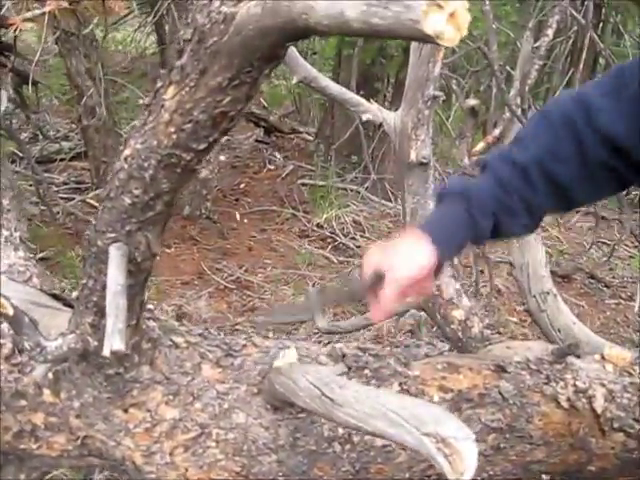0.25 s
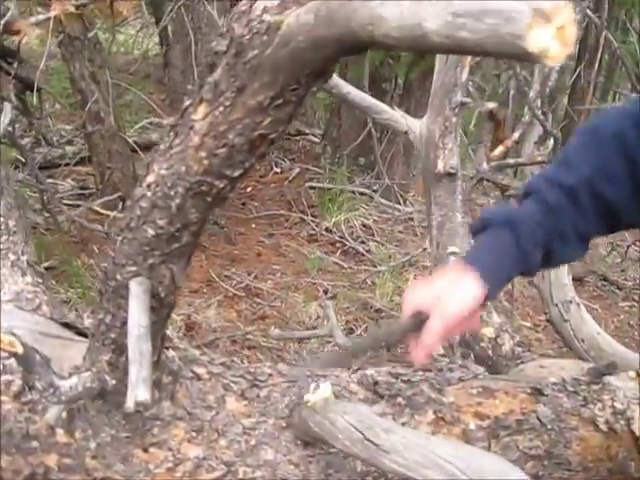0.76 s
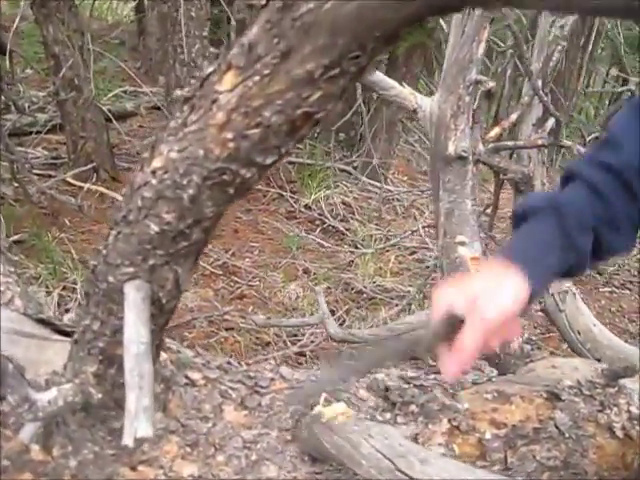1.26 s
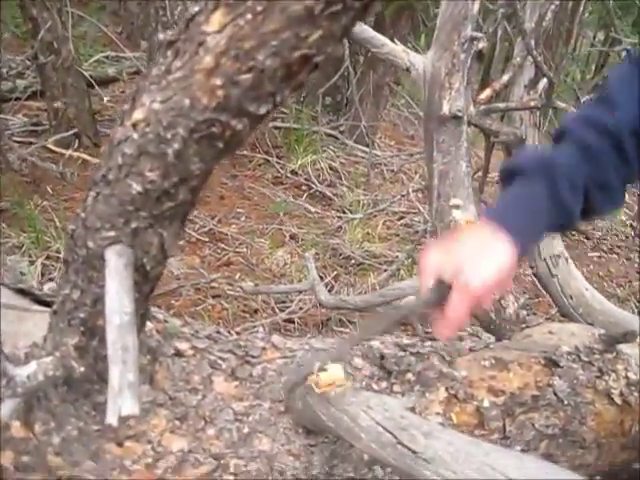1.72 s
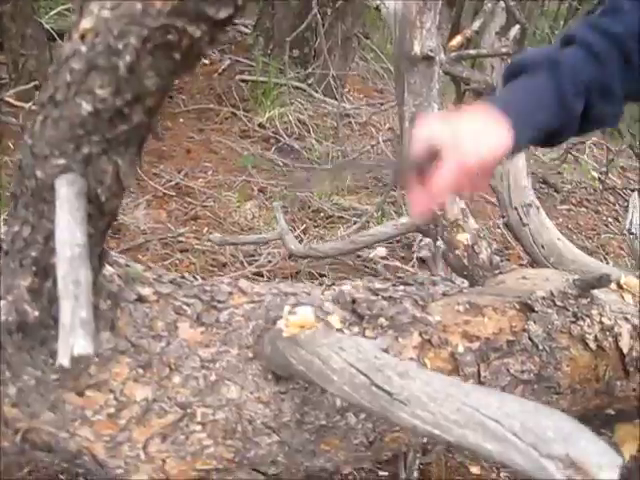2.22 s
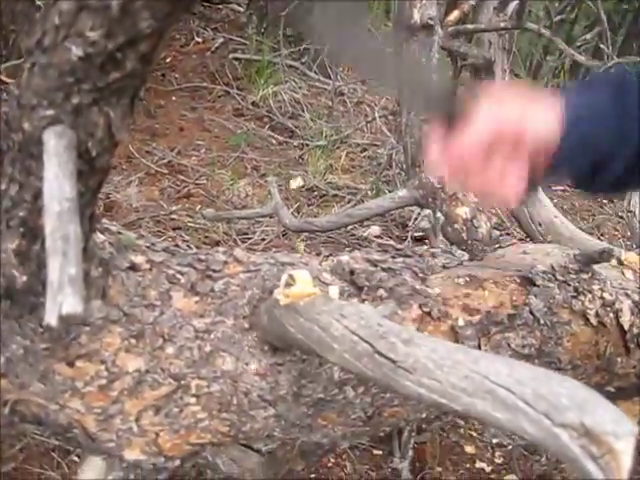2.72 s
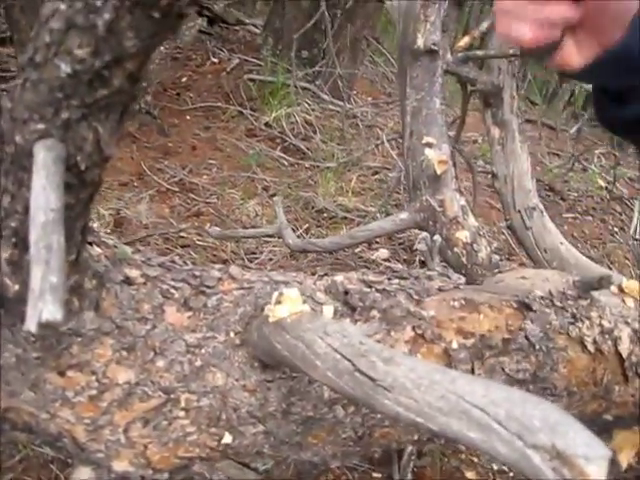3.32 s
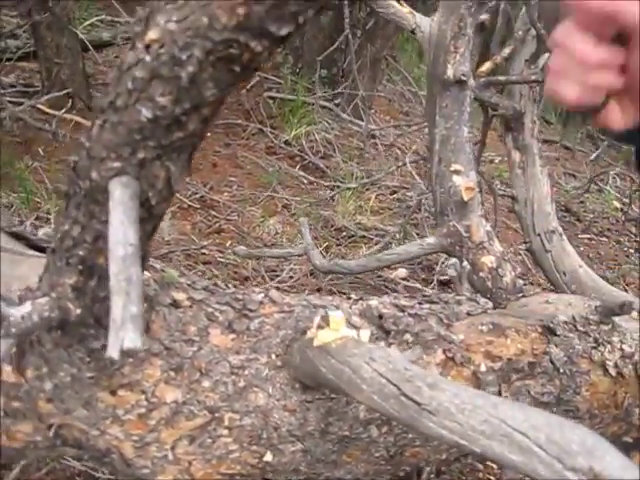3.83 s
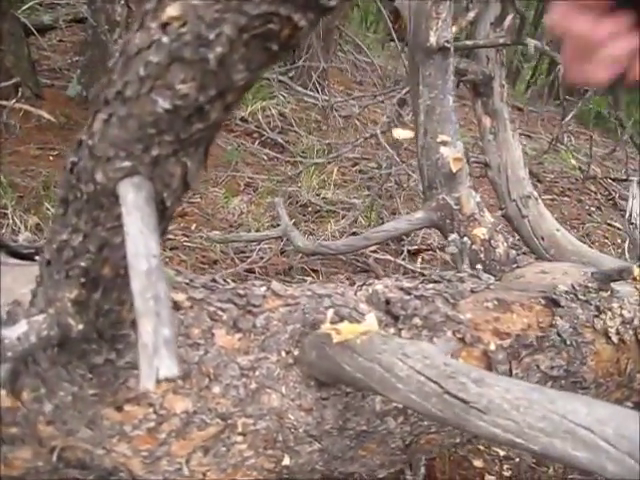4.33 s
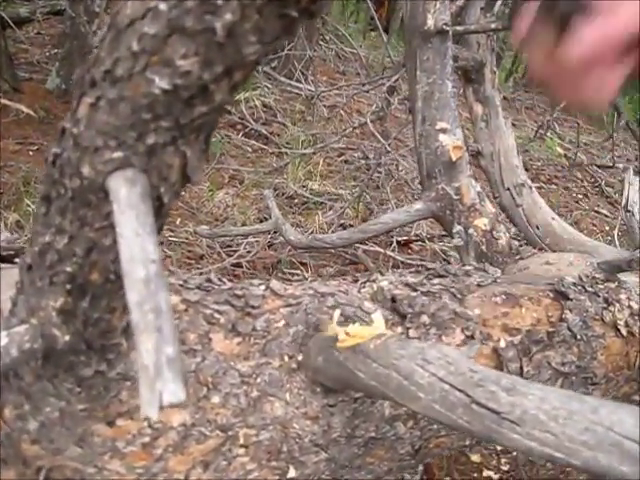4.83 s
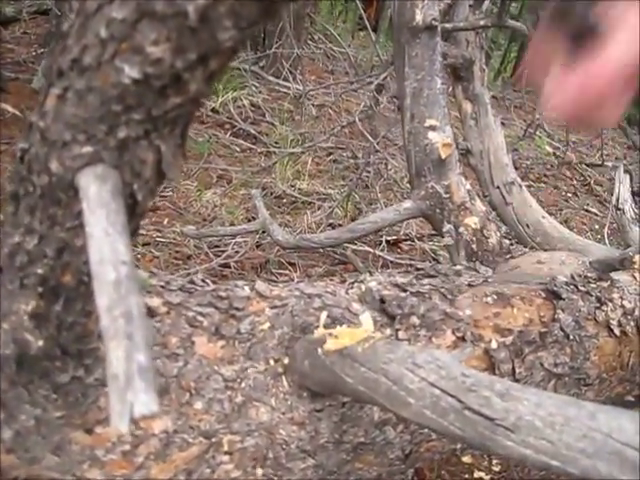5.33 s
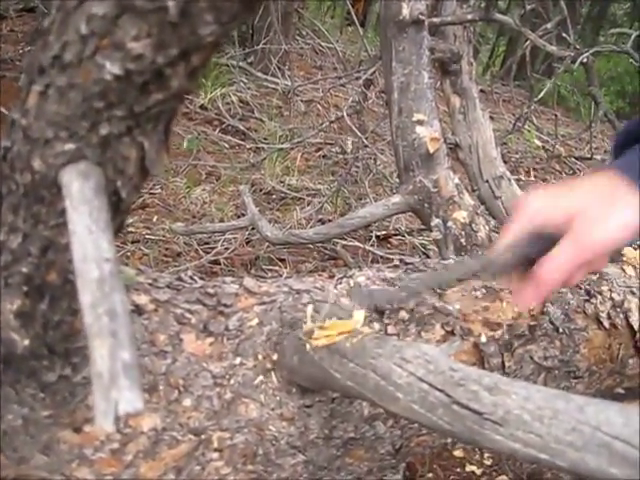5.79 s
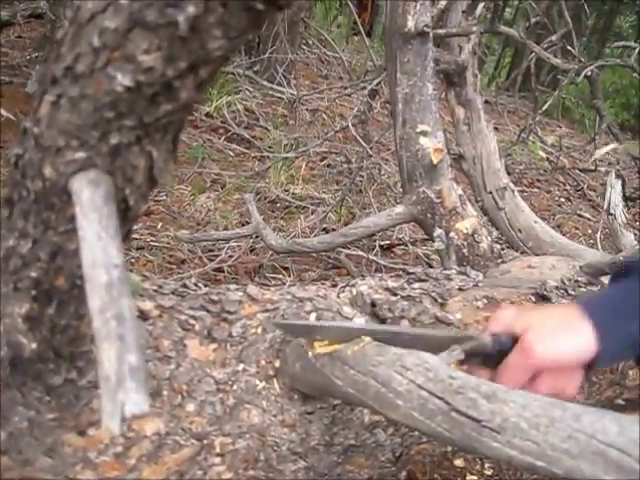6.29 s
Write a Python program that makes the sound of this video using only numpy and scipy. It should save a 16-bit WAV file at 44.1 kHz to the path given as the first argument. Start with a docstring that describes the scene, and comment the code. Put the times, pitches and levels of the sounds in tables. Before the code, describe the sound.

Quiet, still forest air with a faint rustle, then at once a big knife bites a dry log stub close by. Thirteen blows follow at nearly even spacing, about every half second: 0.03, 0.5, 1.0, 1.5, 2.0, 2.5, 3.0, 3.5, 4.0, 4.5, 5.0, 5.5 and, after a slightly longer gap, 6.2 s. Each is a hard, bright splintering crack of a few milliseconds, with a brief woody knock, short blade ring and faint scatter from the trunks. Chips tick irregularly between, sharply near 0.8, 1.8, 3.1 and 5.2 s. Sleeve swishes come near 0.4, 3.7 and 5.7 s; feet crunch in litter around 0.4, 3.7-4.2 and 5.8 s. A distant bird whistles short slurred notes from 1.3 to 2.7 s and again from 6 s, while another trills rapidly from 5.8 s, growing louder. The recorder squashes the peaks, dipping the background after blows.

```python
"""Still forest air and a faint rustle come first, and almost at once a big knife bites a branch stub, close by.
It chops a fallen log's dry stub about twice a second: noise bursts for breaking fibres, decaying sines for
the ringing branch and blade, and noise decaying in bands for the scatter from the trunks.
Close in, chips tick, crumbs fall, a sleeve rustles and feet shift; far off, two birds sing in gliding tones.
The recorder's limiter squashes each blow, its overload rounds the peaks, and the treble is notched and cut."""
import sys
import numpy as np
from scipy import signal
from scipy.fft import rfft, irfft
from scipy.io import wavfile

SR = 44100
rng = np.random.default_rng(int(sys.argv[2]) if len(sys.argv) > 2 else 0)


def output_pcm(signal):
    """Save a mono or channel-first signal as 16-bit PCM at the path in sys.argv[1].

    Samples are clipped to [-1, 1] before scaling.
    """
    pcm = np.clip(np.atleast_2d(signal).T, -1, 1) * 32767
    wavfile.write(sys.argv[1], SR, np.round(pcm).astype(np.int16))


N = 288943
TIME = np.arange(N) / SR
HIT = TIME[:SR // 4]   # time axis of one short sound

# Levels in the tables are relative: each layer adds its own trim.
# Still forest air: pitch_hz [Hz], level_db [dB per Hz]
AIR_SPECTRUM = [(12, -36), (25, 2), (45, 0.5), (87, 5.5), (250, 1), (600, 1), (1330, -5.5), (3820, -4),
                (6400, -15.5), (9500, -11), (16000, -29)]
AIR_DB = -59.5

# Sleeve and litter rustle: start_s [s], level_db [dB]
RUSTLE_LEVEL = [(0.0, -63), (0.25, -64), (0.62, -55.5), (1.09, -59.5), (1.24, -66.5), (1.59, -64),
                (1.81, -63.5), (2.04, -60), (2.24, -73.5), (2.44, -67), (3.1, -58), (3.83, -54.5),
                (4.6, -65.5), (4.87, -64), (5.56, -67), (5.75, -69.5), (6.02, -64.5), (6.55, -64)]
# Its spectrum: pitch_hz [Hz], level_db [dB per Hz]
RUSTLE_SPECTRUM = [(400, 10), (1200, 7.5), (3000, 5), (5500, 6), (9000, 4), (15000, 4.5)]
CLOTH_DB = 4.5   # lift of the rustle above its table
DUST_DB, DUST_FADE_S = -61.5, 0.097   # bark dust shaken loose by each blow
RUB_DB, RUBS_PER_S = 2.0, 130   # spread and rate of the uneven rubbing
CRACKLES_PER_S, CRACKLE_RANGE_DB, CRACKLE_DB = 55, 18, -59

# Blows: start_s [s], bite_s [s, nominal time the edge bites],
# branch_hz and blade_hz [Hz, pitch around which a mode, if close, rings louder],
# crack_hz [Hz], then in dB over 10 ms: crack_db, thick_db (thick fibres), fine_db (fine splinters),
# branch_db (ring), blade_db (ring), push_db (into the log)
BLOWS = [(0.031, 0.002, 556, 1071, 3620, -19.5, -29, -30.5, -29.5, -33.5, -61),
         (0.534, 0.0036, 545, 980, 3184, -15.5, -28.5, -24.5, -28.5, -53, -31.5),
         (1.0422, 0.0033, 550, 1074, 2840, -19.5, -23, -31, -24, -27, -54),
         (1.5355, 0.0036, 466, 1190, 4390, -18.5, -26.5, -25.5, -29, -33, -54),
         (2.014, 0.0025, 547, 984, 4370, -19.5, -21, -28, -27.5, -27.5, -39),
         (2.4983, 0.0023, 470, 1040, 4490, -20.5, -31, -24.5, -33, -36.5, -56),
         (2.984, 0.0025, 561, 930, 3180, -19.5, -25.5, -25.5, -27.5, -24.5, -43.5),
         (3.4696, 0.0028, 490, 933, 2330, -23, -25.5, -24.5, -29, -26, -58),
         (3.9724, 0.0045, 426, 949, 3955, -19.5, -25, -27, -34.5, -25.5, -36),
         (4.5122, 0.0041, 497, 1030, 3350, -20.5, -27.5, -28, -35.5, -31, -46),
         (5.0373, 0.0037, 545, 923, 3010, -21, -29, -26.5, -31, -31.5, -34),
         (5.5277, 0.004, 400, 929, 3490, -19, -28.5, -26.5, -25, -24, -36),
         (6.1763, 0.0028, 457, 937, 3300, -15.5, -28.5, -25, -31.5, -29.5, -34.5)]
# Modes of the branch: pitch_hz [Hz], level_db [dB], t60_s [s]
BRANCH_MODES = [(136.7, -28, 0.55), (358, -13, 0.023), (422.6, -5.5, 0.079), (486.3, -4.5, 0.14),
                (564, 0, 0.053), (656, -0.5, 0.032)]
# Modes of the blade: pitch_hz [Hz], level_db [dB], t60_s [s]
BLADE_MODES = [(936.7, -4, 0.065), (1052, 4.5, 0.012), (1408, -4.5, 0.04), (1863, -4, 0.049),
               (1947, -13, 0.05), (2440, -9, 0.011), (2716, 8, 0.014)]
# Ranges of breaking wood, from thick fibres to the finest: low_hz, high_hz
LOW_CRACK, MAIN_CRACK, HIGH_CRACK = (1080, 2400), (2300, 4800), (4400, 6700)
LOW_SNAP, HIGH_SNAP, FIZZ = (1100, 3100), (3000, 6900), (7800, 18000)
USUAL_BITE_S = 0.004
TEAR_DB, TEAR_DB_PER_DOUBLING = 2.0, 15   # coarse splinters above fine ones; longer bites tear more of them

# Scatter from the trunks: pitch_hz [Hz], level_db [dB per Hz]
ECHO_SPECTRUM = [(130, 10.5), (250, -13), (480, 0), (720, 23.5), (950, -10), (1800, 3), (2700, 3),
                 (5000, 6.5), (7000, -2), (15000, 0)]
# Its decay: pitch_hz [Hz], t60_s [s]
ECHO_DECAY = [(100, 0.85), (480, 0.53), (1500, 1), (4000, 0.54), (15000, 0.2)]

# Crumbs thrown by a blow: flight from, to (s); typical snap, spread, brightness and knock (dB); length (s)
CRUMB_FLIGHT_S = (0.08, 0.40)
CRUMB_DB, CRUMB_SPREAD_DB, CRUMB_BRIGHT_DB, CRUMB_KNOCK_DB, CRUMB_S = -49, 3.5, 7.5, -76, 0.0018

# Sleeve brushing past as the arm swings: start_s [s], length_s [s], level_db [dB]
SLEEVE_SWISHES = [(0.401, 0.28, -52), (3.728, 0.12, -50), (5.644, 0.2, -52.5)]
# Its spectrum: pitch_hz [Hz], level_db [dB per Hz]
SWISH_SPECTRUM = [(500, -3), (1500, 4), (3000, 5), (5600, 7.5), (8000, 0.5), (15000, 4)]

# Feet in the needle litter: start_s [s], length_s [s, nominal], pitch_hz [Hz, crunch], level_db [dB]
FOOT_SCUFFS = [(0.414, 0.042, 427, -36.5), (0.471, 0.066, 604, -50), (3.655, 0.04, 473, -41.5),
               (3.732, 0.057, 900, -37.5), (3.802, 0.067, 720, -35.5), (3.828, 0.042, 390, -34),
               (4.166, 0.022, 510, -38.5), (5.768, 0.015, 505, -35.5)]
CRUNCHES_PER_S, CRUNCH_RANGE_DB = 260, 16

# Louder splinters, chips and twigs: start_s [s], length_s [s, nominal], level_db [dB, snap],
# bright_db [dB], knock_db [dB]
LOUD_TICKS = [(0.42, 0.01, -49, -4, -40.5), (0.5472, 0.0012, -29, 10, -37),
              (0.702, 0.0032, -43.5, 2.5, -50.5), (0.7775, 0.0018, -30.5, 6, -34),
              (1.1066, 0.0031, -45, -3, -47), (1.244, 0.0027, -44, 36, -54),
              (1.659, 0.0013, -32.5, 14.5, -58), (1.8342, 0.0095, -23.5, 11.5, -47),
              (1.9816, 0.0018, -39, 8, -49), (2.142, 0.0014, -45, -2.5, -70), (2.194, 0.0011, -47, -1, -80),
              (2.229, 0.0039, -46.5, 0, -78), (2.664, 0.00071, -50, -5, -69), (2.97, 0.0023, -42.5, 6, -60),
              (3.091, 0.00067, -20.5, 8.5, -36), (3.335, 0.00084, -29, 3, -29),
              (3.362, 0.0008, -44, 7, -44), (3.658, 0.0022, -40, 14, -61),
              (3.668, 0.011, -52.5, -11.5, -39), (3.7498, 0.00072, -40, -3.5, -60),
              (3.819, 0.0028, -30, 1, -37), (4.086, 0.00033, -29, 3, -38.5),
              (4.132, 0.00049, -33.5, 4, -51), (4.171, 0.005, -38, 13, -67), (4.187, 0.0013, -37, 6.5, -65),
              (4.6316, 0.0041, -40.5, 38, -55), (4.6888, 0.0022, -36, 9, -66),
              (4.9723, 0.00073, -40.5, 4, -78), (5.0743, 0.0011, -32.5, 0, -43),
              (5.2407, 0.00087, -23.5, 6, -38), (5.293, 0.0083, -40.5, 6, -69),
              (5.426, 0.0052, -44, 13, -70), (5.532, 0.0032, -19, 5.5, -40), (5.768, 0.0092, -31, 5, -62),
              (5.88, 0.002, -36.5, 12, -76), (6.336, 0.012, -39, 23, -52.5), (6.362, 0.0039, -42.5, 9, -62)]

# Far songbird: start_s [s], length_s [s], start_hz, middle_hz, end_hz [Hz], level_db [dB]
BIRD_WHISTLES = [(1.343, 0.087, 2350, 2990, 3600, -61.5), (1.415, 0.03, 3360, 2650, 2290, -60),
                 (1.733, 0.042, 3100, 2640, 2380, -56.5), (1.851, 0.095, 2700, 2910, 2970, -54),
                 (2.146, .055, 2450, 2845, 2580, -51.5), (2.192, 0.051, 3120, 2790, 2300, -50),
                 (2.316, 0.1, 3300, 3800, 4170, -52), (2.44, 0.085, 4900, 5640, 5750, -62),
                 (2.584, 0.12, 3800, 3110, 2780, -52.5), (5.97, 0.086, 4100, 4200, 4260, -56),
                 (6.122, 0.067, 4100, 3770, 4080, -52.5), (6.276, 0.037, 2800, 3010, 2660, -45),
                 (6.439, 0.062, 4050, 4100, 4330, -49), (6.499, 0.049, 2950, 3170, 3920, -52.5)]
WAVER_PER_S = 0.42   # relative pitch flutter per second of note length
# A second bird's trill: one arched note, repeated evenly and growing louder
TRILL_START_S, TRILL_STEP_S, TRILL_NOTE_S = 5.836, 0.0786, 0.054
TRILL_ARCH_HZ = (4600, 4780, 3890)   # start, middle, end
TRILL_DB, TRILL_RISE_DB_PER_S = -54.5, 11   # first note before the song trim, then the rise
TWINKLE_DB, TWINKLES_PER_S = 3.5, 170

NOTCH_HZ, NOTCH_Q, CUTOFF_HZ = 7900, 5.5, 16100


def from_db(db):
    """Decibels to gain."""
    return 10 ** (np.asarray(db) / 20)


def rms_one(x):
    """Scale to rms 1."""
    return x / np.sqrt(np.mean(x ** 2) + 1e-20)


def sized(x, db):
    """Give a short sound the energy of 10 ms at this level."""
    return from_db(db) * x / np.sqrt(np.sum(x ** 2) / (SR / 100) + 1e-20)


def add(out, start_s, x):
    """Mix x into out from start_s on."""
    i = int(np.clip(round(start_s * SR), 0, N - 1))
    out[i:i + len(x)] += x[:N - i]


def band(x, low_hz, high_hz, order=2):
    """Causal band-pass."""
    sos = signal.butter(order, [low_hz, min(high_hz, 0.47 * SR)], "band", fs=SR, output="sos")
    return signal.sosfilt(sos, x + 1e-18)


def at_hz(points, hz):
    """Read a table on a log-frequency axis."""
    points = np.array(points)
    return np.interp(np.log(hz), np.log(points[:, 0]), points[:, 1])


def drift(rate):
    """Random wandering through `rate` knots a second, spread 1."""
    knots = rng.standard_normal(int(TIME[-1] * rate) + 2)
    return rms_one(np.interp(TIME * rate, np.arange(len(knots)), knots))


def coloured(spectrum):
    """Steady noise with a given spectrum; rms 1."""
    hz = np.fft.rfftfreq(N, 1 / SR) + 1
    noise = rng.standard_normal(N)
    return rms_one(irfft(rfft(noise) * from_db(at_hz(spectrum, hz)), N))


def grains(size, spread_db):
    """Dense tiny fractures of unequal strength."""
    strength = np.clip(rng.standard_normal(size), -2, 2)
    return rng.standard_normal(size) * from_db(spread_db * strength)


def fracture(length, fade_s, tail_db, tail_s):
    """Fibres break while the stress lasts, then the wood settles with a faint crumble."""
    breaking = np.exp(-np.maximum(HIT - length, 0) / fade_s)
    settling = from_db(tail_db) * np.exp(-HIT / tail_s)
    return (breaking + settling) * grains(len(HIT), spread_db=0.5)


def air():
    """Still forest air: steady noise, strongest in the bass."""
    return from_db(AIR_DB) * coloured(AIR_SPECTRUM)


def crackle(level):
    """Tiny fractures in rubbed cloth and litter; the more movement, the more of them."""
    born = rng.random(N) < CRACKLES_PER_S * level / level.mean() / SR
    sizes = from_db(-CRACKLE_RANGE_DB * rng.random(N)) * rng.choice([-1, 1], N)
    snap = fracture(0.00016, fade_s=0.0017, tail_db=-12, tail_s=0.005)
    snaps = signal.fftconvolve(born * sizes, snap)[:N]
    return from_db(CRACKLE_DB) * rms_one(band(snaps, 1600, 13000, order=1))


def swishes():
    """The sleeve brushes past as the arm swings: noise that swells and dies, roughened by a fast drift."""
    brushing = np.zeros(N)
    for start_s, length_s, level_db in SLEEVE_SWISHES:
        progress = np.clip((TIME - start_s) / length_s, 0, 1)
        brushing += from_db(level_db) * np.sin(np.pi * progress)
    roughness = from_db(8.0 + 2.2 * drift(220))
    return roughness * brushing * coloured(SWISH_SPECTRUM)


def rustle():
    """Cloth rubs as the arm swings and dust trickles after each blow, both as unevenly rubbed noise."""
    dust = np.zeros(N)
    for start_s, *_ in BLOWS:
        dust += from_db(DUST_DB) * (TIME > start_s) * np.exp(-np.abs(TIME - start_s) / DUST_FADE_S)
    cloth = from_db(np.interp(TIME, *np.transpose(RUSTLE_LEVEL)) + CLOTH_DB)
    level = np.hypot(cloth, dust)
    rubbed = level * coloured(RUSTLE_SPECTRUM) + swishes()
    return rubbed * from_db(RUB_DB * drift(RUBS_PER_S)) + crackle(level)


def ring(modes, favoured_hz, favour_db, spread_db, detune):
    """Struck modes; one close to the favoured pitch rings louder, and each strength and pitch varies at random."""
    hz, db, t60 = np.transpose(modes)[:, :, None]
    strength, shift = rng.standard_normal((2, len(modes), 1))
    closeness = np.exp(-(np.log(hz / favoured_hz) / 0.013) ** 2)
    db = db + spread_db * strength + favour_db * closeness
    signs = (-1) ** np.arange(len(modes))[:, None]   # neighbouring modes start in opposite phase
    tones = np.sin(2 * np.pi * hz * (1 + detune * shift) * HIT)
    return np.sum(signs * from_db(db - 60 * HIT / t60) * tones, axis=0)


def log_return(start_hz, end_hz, glide_s, width_hz, t60):
    """Bending waves run along the log and come back; the slow low ones arrive last, so the note sags."""
    hz = end_hz + (start_hz - end_hz) * np.exp(-HIT / glide_s)
    phase = 2 * np.pi * np.cumsum(hz) / SR
    lowpass = signal.butter(2, width_hz / 2, fs=SR, output="sos")
    scatter = signal.sosfilt(lowpass, rng.standard_normal((2, len(HIT))))
    note = scatter[0] * np.cos(phase) + scatter[1] * np.sin(phase)   # a narrow band of noise around hz
    return note * from_db(-60 * HIT / t60)


def chops():
    """The edge pushes the log, breaks fibres, and sets branch and blade ringing."""
    out = np.zeros(N)
    for (start_s, bite_s, branch_hz, blade_hz, _, crack_db, thick_db, fine_db,
         branch_db, blade_db, push_db) in BLOWS:
        tear_db = fine_db + TEAR_DB + TEAR_DB_PER_DOUBLING * np.log2(bite_s / USUAL_BITE_S)
        force = fracture(1.18 * bite_s, fade_s=0.00074, tail_db=-14.5, tail_s=0.012)
        # the wood around the cut gives way more slowly
        flex = fracture(0.81 * bite_s, fade_s=0.0022, tail_db=-11, tail_s=0.016)
        push = sized(band(np.exp(-HIT / 0.0003), 27, 490, order=1), push_db - 6.5)
        thick = sized(band(flex, *LOW_CRACK, order=3), thick_db)
        crack = sized(band(force, *MAIN_CRACK), crack_db - 3.5)
        coarse = sized(band(force, *HIGH_CRACK, order=3), tear_db)
        fine = sized(band(force, *FIZZ, order=3), fine_db)
        branch = ring(BRANCH_MODES, branch_hz, favour_db=7.5, spread_db=5.0, detune=0.025)
        branch = sized(branch, branch_db - 2.5)
        thud = sized(band(flex, 306, 1200), branch_db - 5.0)
        returning = log_return(639.4, 390.0, glide_s=0.054, width_hz=202, t60=0.29)
        returning = sized(returning, 0.5 * branch_db - 24.5)
        blade = ring(BLADE_MODES, blade_hz, favour_db=9.0, spread_db=1.0, detune=0.014)
        blade = sized(blade, blade_db - 0.5)
        add(out, start_s, push + thick + crack + coarse + fine + branch + thud + returning + blade)
    return out


def stub_note(hz, length, fade_s):
    """The short stub shrills at one pitch while the edge is biting, then fades."""
    onset = 1 - np.exp(-HIT / 0.0001)
    fade = np.exp(-np.maximum(HIT - length, 0) / fade_s)
    return np.sin(2 * np.pi * hz * HIT) * onset * fade


def stub():
    """The stub's shrill note gives each crack its pitch; it is heard only close by."""
    out = np.zeros(N)
    for start_s, bite_s, _, _, crack_hz, crack_db, *_ in BLOWS:
        add(out, start_s, sized(stub_note(crack_hz, 0.4 * bite_s, fade_s=0.0009), crack_db - 1.5))
    return out


def forest(x, build_s):
    """Diffuse scatter from trunks: noise that builds up, and dies band by band."""
    t = TIME[:SR]
    echo = np.zeros(SR)
    edges = np.geomspace(60, 17000, 15)
    for low, high in zip(edges, edges[1:]):
        hz = np.sqrt(low * high)
        decay_db = at_hz(ECHO_SPECTRUM, hz) - 60 * t / at_hz(ECHO_DECAY, hz)
        echo += band(rng.standard_normal(SR), low, high) * from_db(decay_db)
    echo *= 1 - np.exp(-t / build_s)
    return signal.fftconvolve(x, echo / np.sqrt(np.sum(echo ** 2)))[:N]


def tick(length, db, bright_db, knock_db):
    """One small dry snap over a dull knock; the brighter it is, the less of its low part."""
    force = fracture(1.04 * length, fade_s=0.00079, tail_db=-13.5, tail_s=0.0097)
    body = fracture(length, fade_s=0.0013, tail_db=-25, tail_s=0.011)
    knock = sized(band(body, 202, 1100), knock_db)
    low_snap = sized(band(force, *LOW_SNAP), db - bright_db)
    high_snap = sized(band(force, *HIGH_SNAP), db)
    fizz = sized(band(force, *FIZZ), db - 0.74)
    return knock + low_snap + high_snap + fizz


def crumbs(count):
    """Every blow throws a few crumbs of wood that land faintly in the litter."""
    out = np.zeros(N)
    for start_s, *_ in BLOWS:
        flights = rng.uniform(*CRUMB_FLIGHT_S, count)
        for flight_s, (size, tone) in zip(flights, rng.standard_normal((count, 2))):
            landing = tick(CRUMB_S, CRUMB_DB, CRUMB_BRIGHT_DB + 3 * tone, CRUMB_KNOCK_DB)
            add(out, start_s + flight_s, from_db(CRUMB_SPREAD_DB * size) * landing)
    return out


def scuffs():
    """A sole presses into the litter: twigs and bark give way one by one, a dull crunch that swells and dies."""
    out = np.zeros(N)
    for start_s, length_s, pitch_hz, level_db in FOOT_SCUFFS:
        age = HIT / (0.37 * length_s)
        chance, size, sign = rng.random((3, len(HIT)))
        snaps = (chance < CRUNCHES_PER_S / SR) * from_db(-CRUNCH_RANGE_DB * size) * np.sign(sign - 0.5)
        crush = rms_one(snaps) + from_db(-10) * grains(len(HIT), spread_db=5.0)
        pitched = rms_one(band(crush, 0.62 * pitch_hz, 1.4 * pitch_hz))
        broad = from_db(1) * rms_one(band(crush, 520, 4300, order=1))
        swell = age * np.exp(1 - age)
        add(out, start_s, from_db(level_db - 7) * swell * (pitched + broad))
    return out


def ticks():
    """A splinter tears off, a chip lands, the blade clips a twig: each a small snap."""
    out = np.zeros(N)
    for start_s, *snap in LOUD_TICKS:
        add(out, start_s, tick(*snap))
    return out


def whistle(length, pitches, waver):
    """One slurred note through three pitches; a fast flutter of pitch makes it buzzy."""
    u = np.linspace(0, 1, int(length * SR))
    flutter_hz = 210 * (1 + 0.54 * drift(401)[:len(u)])
    flutter = np.sin(2 * np.pi * np.cumsum(flutter_hz) / SR)
    slur_hz = np.polyval(np.polyfit([0, 0.5, 1], pitches, 2), u)
    phase = 2 * np.pi * np.cumsum(slur_hz * (1 + waver * flutter)) / SR
    return np.sqrt(2) * np.sin(np.pi * u) * np.sin(phase)


def birds():
    """Two birds far off; the many paths between the trunks make their notes twinkle, as a fast level drift."""
    out = np.zeros(N)
    for start_s, length_s, start_hz, middle_hz, end_hz, level_db in BIRD_WHISTLES:
        note = whistle(length_s, [start_hz, middle_hz, end_hz], WAVER_PER_S * length_s)
        add(out, start_s, from_db(level_db) * note)
    for start_s in np.arange(TRILL_START_S, TIME[-1], TRILL_STEP_S):
        level_db = TRILL_DB + TRILL_RISE_DB_PER_S * (start_s - TRILL_START_S)
        add(out, start_s, from_db(level_db) * whistle(TRILL_NOTE_S, TRILL_ARCH_HZ, waver=0.01))
    return out * from_db(TWINKLE_DB * drift(TWINKLES_PER_S) + 1.0)


def scene():
    """Near blows with a faint echo, far birds with a stronger one, and the air; one channel."""
    wood = from_db(4.5) * chops() + ticks() + crumbs(count=3)
    song = birds()
    near = wood + stub() + scuffs() + rustle() + from_db(-29.0) * forest(wood, build_s=0.038)
    far = song + from_db(-10) * forest(song, build_s=0.0031)
    return (near + far + air())[None]


def limiter(x, threshold_db, release_db_per_s, attack_s):
    """Gain drops on each peak and creeps back, so the background ducks after a blow."""
    over = np.maximum(20 * np.log10(np.abs(x) + 1e-9) - threshold_db, 0)
    release = release_db_per_s * TIME
    held = np.maximum.accumulate(over + release, axis=-1) - release   # peak hold falling at a steady rate
    r = np.exp(-1 / (attack_s * SR))
    return x * from_db(-signal.lfilter([1 - r], [1, -r], held))


def record(dry):
    """Limiter, overload of the peaks it lets through, a notch in the treble, and the top cut."""
    x = limiter(dry, threshold_db=-6.5, release_db_per_s=57.0, attack_s=0.011)
    ceiling = 0.5
    x = x / (1 + (x / ceiling) ** 6) ** (1 / 6)   # rounds off towards the ceiling
    x = signal.lfilter(*signal.iirnotch(NOTCH_HZ, NOTCH_Q, fs=SR), x)
    return signal.sosfilt(signal.ellip(10, 0.3, 70, CUTOFF_HZ, fs=SR, output="sos"), x)


dry = scene()
out = record(dry)
output_pcm(out)
```